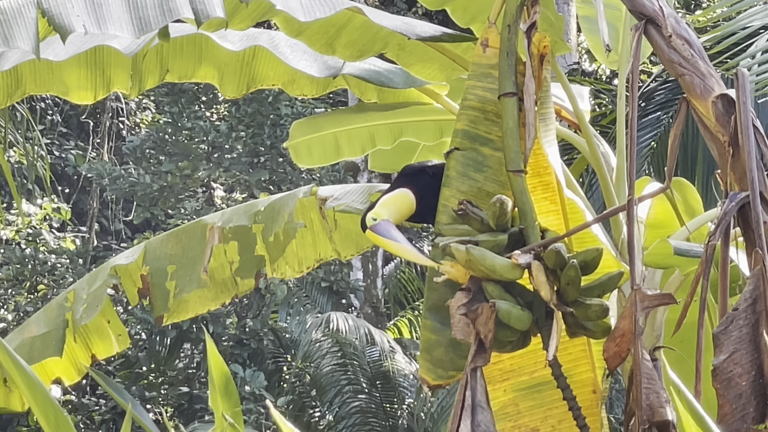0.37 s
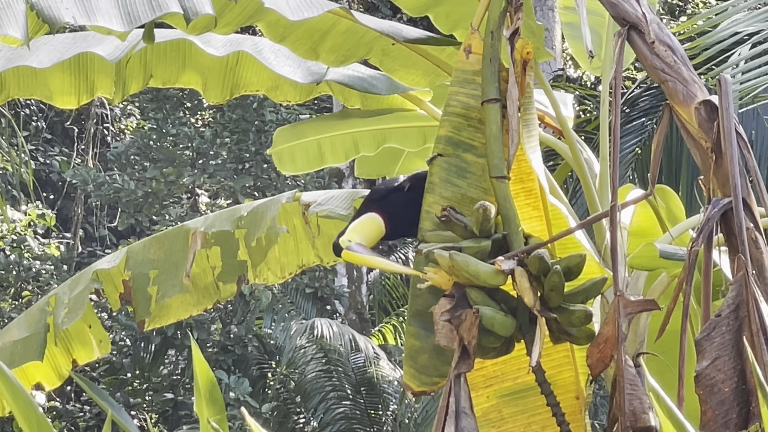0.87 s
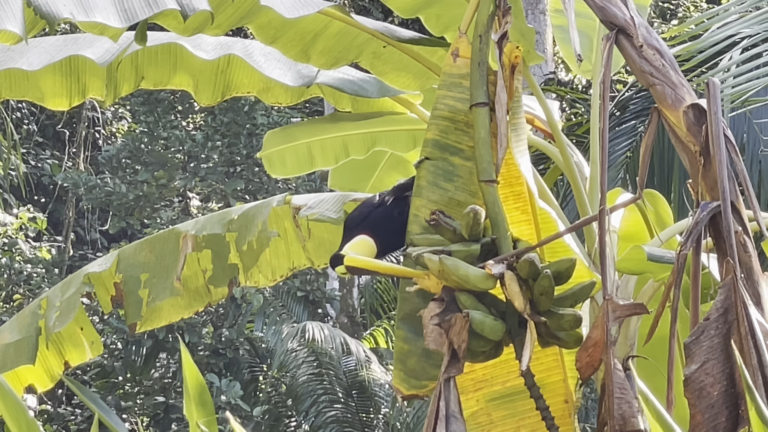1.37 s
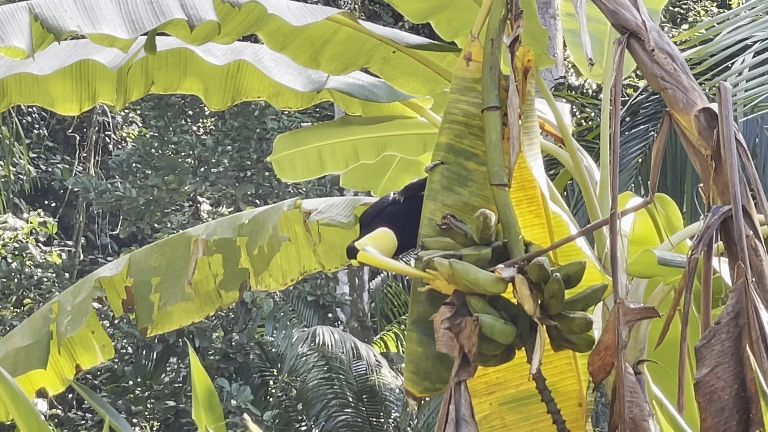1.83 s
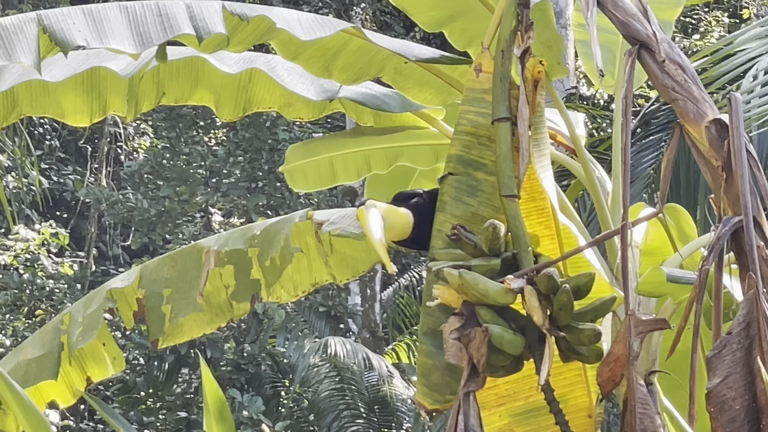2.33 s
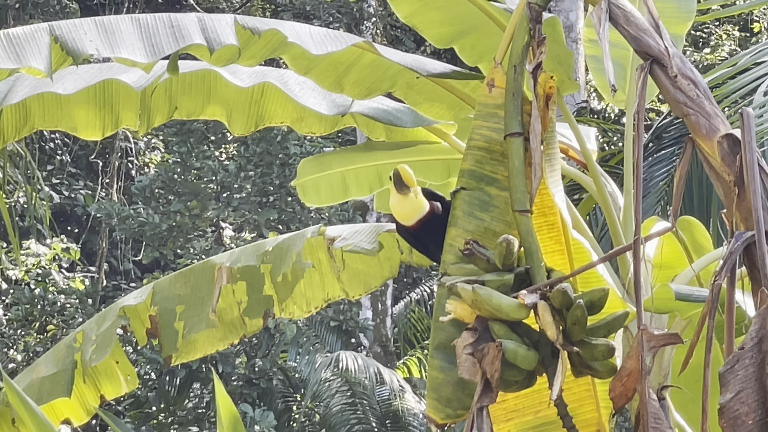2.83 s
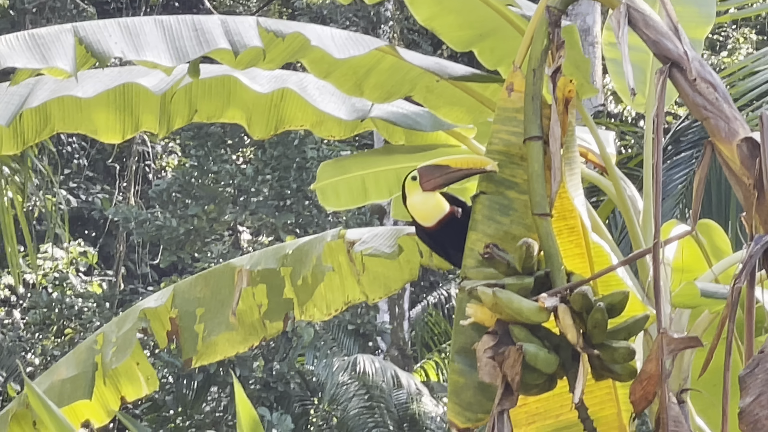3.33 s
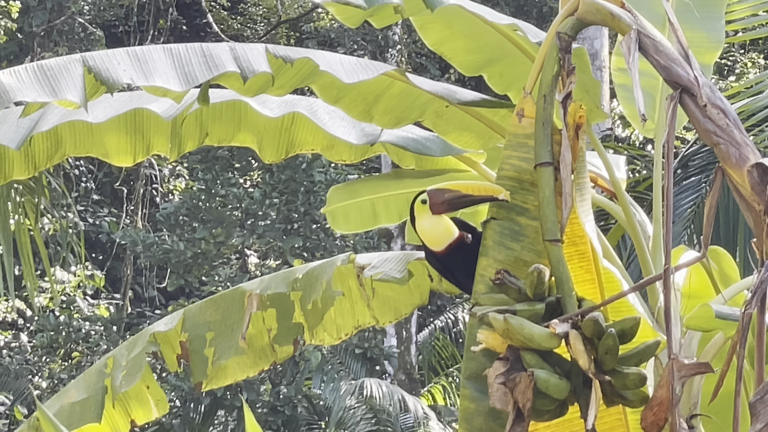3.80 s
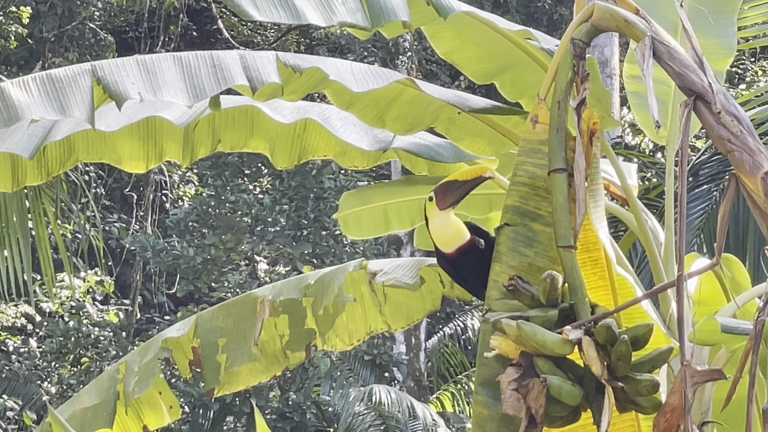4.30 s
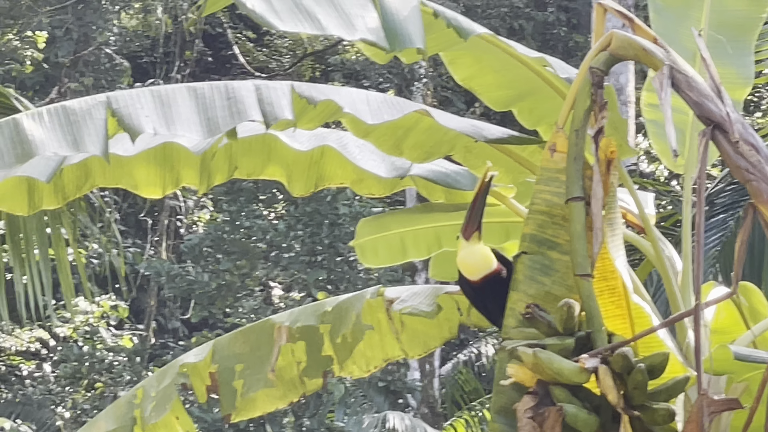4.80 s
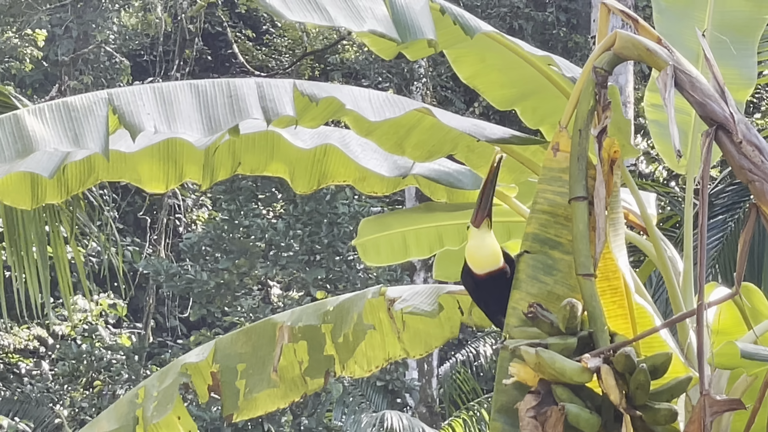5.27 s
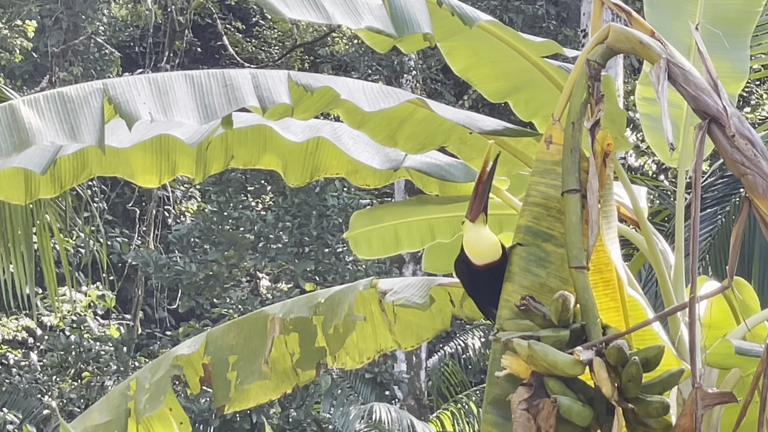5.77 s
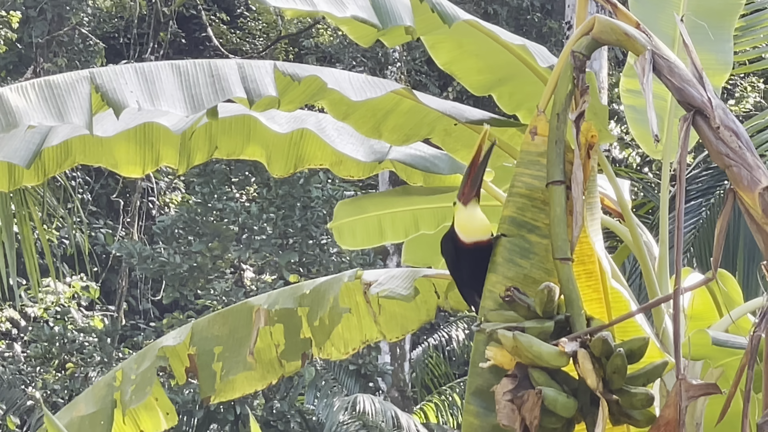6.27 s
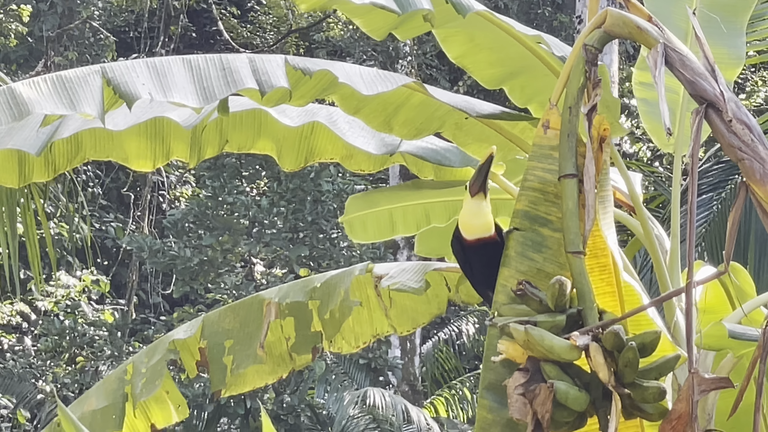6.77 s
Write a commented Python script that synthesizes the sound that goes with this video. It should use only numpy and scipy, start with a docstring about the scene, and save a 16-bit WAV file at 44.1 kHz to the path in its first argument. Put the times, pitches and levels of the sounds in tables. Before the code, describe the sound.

A cicada chorus sounds from start to end, about 7 seconds, in an open tropical forest: a shrill, narrow ringing near 3 kHz, made of several closely pitched wavering voices, pulsing around 18 times a second, with a fainter raspy edge above. The throb is clearest in the first 3 seconds and smooths later. A very high, thin sizzling buzz, around 12 to 15 kHz, fades by 3 s, creeps back and steps up at 4.2 s, then holds. Far leaf rustle and air hiss stay faint below. Low breeze flutters on the stereo microphone; from 0.8 s puffs push in, with deep soft thumps strongest near 0.95 and 1.4-1.5 s, continuing weaker until just past 3 s. Dull little housing ticks fall near 1.2, 1.35 and 2.15 s. Gentler puffs return around 4.3 and 6.2 s.

```python
"""From the start a cicada chorus rings in a tropical forest: tymbal clicks excite narrow body resonances near
3 kHz and throb about 18 times a second. Over it a very high buzz of filtered clicks fades by 3 s, creeps back
and steps up again at 4.2 s. Below lie far rustle and air hiss, both shaped noise. A noise breeze pushes and
flutters on two microphone ports; from about 0.8 s bell-shaped puffs rise out of it, with damped thumps until
just past 3 s and three dull ticks on the housing between 1.2 and 2.2 s."""
import sys
import numpy as np
from scipy import signal
from scipy.fft import rfft, irfft
from scipy.io import wavfile

SR = 44100
rng = np.random.default_rng(int(sys.argv[2]) if len(sys.argv) > 2 else 0)


def to_linear_factor(level_db):
    """Convert decibel levels (scalar or array-like) to linear amplitude factors."""
    exponent = np.asarray(level_db, float) / 20
    return 10 ** exponent


def generate_wav(sig):
    """Save sig (samples, or channels by samples) to the path in sys.argv[1] as 16-bit PCM at SR."""
    pcm = np.round(np.clip(np.atleast_2d(sig).T, -1, 1) * 32767).astype(np.int16)
    wavfile.write(sys.argv[1], SR, pcm)


N = 303408
HZ = np.maximum(np.arange(N // 2 + 1) * SR / N, 1)
CLICKS_PER_S = 20000


def rms_one(x):
    """Scale to unit rms."""
    return x / np.sqrt(np.mean(x ** 2) + 1e-20)


def in_time(rows):
    """Columns of a curve table, one value a sample."""
    s, *columns = np.transpose(rows)
    return [np.interp(np.arange(N) / SR, s, c) for c in columns]


def over_hz(rows):
    """Columns of a spectrum table, one value a frequency bin, straight over log frequency."""
    hz, *columns = np.transpose(rows)
    return [np.interp(np.log(HZ), np.log(hz), c) for c in columns]


def drift(rate_hz):
    """Slow random wander of spread 1: noise through two equal one-pole low-passes at rate_hz."""
    step = 40   # samples between drawn points
    settle = 2000   # points dropped while the filter fills
    r = np.exp(-2 * np.pi * step * rate_hz / SR)
    noise = rng.standard_normal(N // step + settle + 2)
    slow = signal.lfilter([1], [1, -2 * r, r * r], noise)[settle:]
    return np.interp(np.arange(N) / step, np.arange(len(slow)), rms_one(slow))


def coloured(colour):
    """Two unrelated noises, flat at 0 dB per Hz, shaped by a spectrum that closes beyond its end points."""
    gain = to_linear_factor(over_hz(colour)[0])
    gain = gain * np.minimum(HZ / colour[0][0], 1) ** 2
    gain = gain * np.minimum(colour[-1][0] / HZ, 1) ** 2
    return irfft(rfft(rng.standard_normal((2, N))) * gain, N) * np.sqrt(SR / 2)


def resonate(x, hz, width_hz):
    """A two-pole resonance passed twice, gain about 1 on top."""
    r = np.exp(-np.pi * width_hz / SR)
    g = (1 - r * r) / 2
    stage = [g, 0, -g, 1, -2 * r * np.cos(2 * np.pi * hz / SR), r * r]
    return signal.sosfilt([stage, stage], x)


def clicks(per_s):
    """Random clicks of either sign, 0 dB per Hz; two unrelated crowds."""
    born = rng.random((2, N)) < per_s / SR
    return rms_one(born * rng.standard_normal((2, N))) * np.sqrt(SR / 2)


# The nearest singer's throb. Each row: time in seconds, lead over a steady beat in turns, depth 0-1.
THROB_CURVE = [(0.0, -0.46, 0.55), (0.5, -0.62, 0.63), (0.8, -0.55, 0.65), (1.2, -0.23, 0.6),
               (2.0, -0.07, 0.8), (3.0, 0.13, 0.66), (3.6, -0.03, 0.45), (4.0, -0.38, 0.26),
               (4.4, -0.95, 0.22), (4.8, -1.17, 0.34), (5.6, -1.5, 0.36), (6.0, -1.5, 0.42),
               (6.88, -2.13, 0.08)]


def throb():
    """The beat of the tymbals: phase in turns, hurrying and dragging about a steady rate, and its depth."""
    throb_per_s = 17.8
    lead, depth = in_time(THROB_CURVE)
    return throb_per_s * np.arange(N) / SR + lead, depth


# Slow swell of the ringing bodies. Each row: time in seconds, loudness in dB (only its sway is used).
CHORUS_SWELL = [(0, -37.5), (1, -36.5), (2, -37), (2.7, -39), (3.1, -36.5), (3.7, -36.5), (4.3, -38.5),
                (5.3, -36), (6, -37.5), (6.88, -38)]


def chorus_swell():
    """Slow rise and fall of the chorus, in dB about its mean."""
    chorus_db = in_time(CHORUS_SWELL)[0]
    return chorus_db - chorus_db.mean()


# What the tymbal clicks ring with. Each row: centre in Hz, width in Hz, level in dB per Hz before the
# modulation, throb swing in dB at full depth, throb lag in turns.
BODY_BANDS = [(2933, 70, -63, 6.5, 0), (2842.5, 120, -64, 1, 0), (2763, 188, -66.5, -1.5, 0.021),
              (2580, 323, -75, 1.5, 0.0039), (2296, 200, -82.5, -1, 0.035), (1910, 92, -88, -3, 0.036),
              (3023, 74, -71.5, -2, 0.048), (3107, 177, -77.5, -4, 0.094), (3434, 300, -85.5, 7, 0.038),
              (3578, 46, -79, -6, 0.091), (5106, 1120, -83, 2, 0.4), (6990, 2280, -84, 2.5, 0.34),
              (7620, 780, -87, 8.5, 0.39), (8920, 1150, -93.5, 14, 0.37)]


def ringing_bodies():
    """Clicks ring the body with each throb, then a brighter rasp follows over a third of a turn later."""
    rasp_lag_turns = 0.2   # bands lagging more than this are the rasp
    far_per_s, far_db, far_start_turns = 12.6, 0.85, 0.3   # a farther singer's slower throb in the rasp
    turns, depth = throb()
    swell_db = chorus_swell()
    far_turns = far_per_s * np.arange(N) / SR + far_start_turns
    far_throb_db = far_db * np.cos(2 * np.pi * far_turns)
    crowds = [clicks(CLICKS_PER_S), clicks(CLICKS_PER_S)]
    out = 0
    for k, (hz, width_hz, level_db, swing_db, lag) in enumerate(BODY_BANDS):
        ringing_db = swell_db * (lag == 0)   # only bands without lag follow the slow swell
        rasp_db = far_throb_db * (lag > rasp_lag_turns)
        beat_db = swing_db * depth * np.cos(2 * np.pi * (turns - lag))
        effort = to_linear_factor(level_db + ringing_db + rasp_db + beat_db)
        out = out + resonate(crowds[k % 2] * effort, hz, width_hz)   # neighbours take turns at the crowds
    return out


# Nearer singers' notes. Each row: pitch in Hz, rms waver in Hz, level in dB before the modulation,
# throb swing in dB at full depth.
PURE_NOTES = [(2933, 21.95, -43, 5.5), (2885, 30.08, -45, 2.5), (2839, 25.04, -44.5, 5.5)]


def near_notes():
    """Bodies of nearer singers hold an almost pure sine whose pitch wavers separately in each channel."""
    turns, depth = throb()
    swell_db = chorus_swell()
    out = 0
    for hz, waver_hz, level_db, swing_db in PURE_NOTES:
        pitch = hz + waver_hz * np.array([drift(59.6), drift(56.0)])
        note = np.sqrt(2) * np.sin(2 * np.pi * np.cumsum(pitch, axis=1) / SR)
        beat_db = swing_db * depth * np.cos(2 * np.pi * turns)
        out = out + note * to_linear_factor(level_db + swell_db + beat_db)
    return out


# The buzz fading out, creeping back, then starting afresh. Each row: time in seconds, level in dB.
BUZZER_LEVEL = [(0, -48.5), (1.5, -48), (2.65, -52.5), (2.95, -63), (3.5, -60.5), (4.16, -53), (4.2, -49),
                (6.88, -49.2)]
# The buzzer's resonances. Each row: centre in Hz, width in Hz, relative level in dB.
BUZZER_BANDS = [(11990, 550, -3), (12720, 900, 1.5), (14450, 2200, -1), (15600, 1500, -8)]


def buzzer():
    """Dense clicks, rippled by under 1 dB at a wavering stroke rate, ring high resonances of alternate sign."""
    strokes_per_s, waver, swing_db = 250.5, 0.002, -0.4
    turns = np.cumsum(strokes_per_s * (1 + waver * drift(3.8))) / SR
    strokes = np.cos(2 * np.pi * turns) + 0.9 * np.cos(4 * np.pi * turns)
    train = clicks(CLICKS_PER_S) * to_linear_factor(swing_db * strokes)
    body = 0
    for k, (hz, width_hz, db) in enumerate(BUZZER_BANDS):
        body = body + to_linear_factor(db) * resonate(train, hz, width_hz) * (-1) ** k
    return to_linear_factor(in_time(BUZZER_LEVEL)[0]) * rms_one(body)


# Far rustle of the forest. Each row: time in seconds, gain in dB on top of the colour.
RUSTLE_SWELL = [(0.0, -61.5), (0.96, -64), (2.36, -61), (2.53, -58), (3.01, -61), (3.45, -58), (4.35, -58),
                (5.88, -59), (6.88, -56)]
# Its colour. Each row: frequency in Hz, density in dB per Hz before the swell.
RUSTLE_SPECTRUM = [(60, -45), (150, -23), (300, -23.5), (500, -25), (850, -25.5), (1300, -32), (2000, -36)]


def rustle():
    """Smooth far noise of leaves, swelling slowly with a small random wander."""
    return to_linear_factor(in_time(RUSTLE_SWELL)[0] + 0.93 * drift(2.1)) * coloured(RUSTLE_SPECTRUM)


# Steady air hiss. Each row: frequency in Hz, density in dB per Hz.
HISS_SPECTRUM = [(300, -91.5), (1000, -97.5), (1700, -91), (3750, -94.5), (4300, -86), (6000, -89.5),
                 (10000, -94), (11500, -92.5), (16000, -89.5)]


def hiss():
    """Steady shaped noise of the air."""
    return coloured(HISS_SPECTRUM)


def evened(x, share):
    """Take part of the chance swell out of a noise, so that the gust has more say in its level."""
    envelope = np.abs(signal.hilbert(x))
    return rms_one(x / (envelope + 0.41 * x.std()) ** share)


# Breeze between puffs. Each row: time in seconds, level of the deep push in dB, level of the flutter in dB,
# both before the random gusts and the low cut.
BREEZE = [(0, -55, -52.5), (.7, -59, -56.5), (.95, -40, -52), (1.1, -42, -45), (1.3, -45, -55),
          (1.55, -41, -46), (1.8, -51, -53), (2.4, -51.5, -55), (2.55, -64, -57), (2.85, -46, -44.5),
          (3.1, -54, -56.5), (3.5, -61.5, -56), (4.12, -64, -50.5), (4.4, -56, -54), (5.0, -56.5, -51.5),
          (5.95, -53, -49.5), (6.4, -48, -47), (6.88, -60, -54)]
# Colour of the push. Each row: frequency in Hz, relative density in dB.
PUSH_SPECTRUM = [(13, -43), (22, -11), (37, -8.5), (54, 6.5), (110, -8.5), (140, -37), (240, -120)]
# Colour of the flutter. Each row: frequency in Hz, relative density in dB.
FLUTTER_SPECTRUM = [(50, -29), (85, -1.5), (134, -3.5), (173, -11), (244, -17.5), (312, -26), (600, -47.5),
                    (780, -78), (1320, -120)]


def wind():
    """Eddies press on the ports: a deep push and a faster, lumpier flutter, both rising with each puff."""
    push_gust_db, flutter_gust_db, lumpy_db = 3.0, 1.2, 2.0
    push_db, flutter_db = in_time(BREEZE)
    puff_push, puff_flutter = puffs()
    eddies = drift(7.7)
    # breeze and puffs add as powers
    push = np.sqrt(to_linear_factor(2 * (push_db + push_gust_db * eddies)) + puff_push)
    flutter = np.sqrt(to_linear_factor(2 * (flutter_db + flutter_gust_db * eddies)) + puff_flutter)
    flutter = flutter * to_linear_factor(lumpy_db * drift(25.0))
    deep = push * evened(coloured(PUSH_SPECTRUM), 0.41)
    quick = flutter * evened(coloured(FLUTTER_SPECTRUM), 0.13)
    low_cut = signal.butter(2, 38, "high", fs=SR, output="sos")
    return signal.sosfilt(low_cut, deep + quick)


# Puffs that rise out of the breeze. Each row: time of the top in seconds, level of the push in dB,
# length in seconds, flutter over the push in dB; levels before the low cut.
PUFF_LIST = [(0.837, -41.5, 0.042, -6), (0.957, -29.5, 0.042, -19), (1.066, -35, 0.11, -4.5),
             (1.275, -42, 0.067, -8), (1.423, -24.5, 0.054, 1.5), (1.528, -29.5, 0.051, -9),
             (1.634, -36.5, 0.034, -3.5), (1.71, -39, .04, -3), (1.84, -42, 0.034, -16),
             (1.964, -44, 0.12, -4.5), (2.108, -43.5, .06, -7), (2.278, -42, .04, -4),
             (2.37, -45, 0.053, -6), (2.592, -49.5, .05, 6.5), (2.794, -43, 0.069, -6),
             (3.18, -46, .06, -10), (3.35, -45, .07, -0.5), (4.284, -43.5, .05, -6), (4.362, -40, .04, -11),
             (4.482, -43.5, 0.061, 2.5), (4.74, -47.5, 0.061, -15), (5.1, -46, .04, -4),
             (6.05, -45, .05, -13), (6.163, -37.5, 0.043, -8), (6.405, -43, .05, -12), (6.8, -47.5, .07, 0)]


def puffs():
    """Each puff swells and sinks like a bell; powers of the push and of the flutter."""
    rise_share = 0.47   # share of a puff's length spent rising
    step = 40   # samples between points of the curve
    s, push_db, length_s, flutter_db = np.transpose(PUFF_LIST)[:, :, None]
    late = np.arange(0, N, step) / SR - s
    side_s = length_s * np.where(late < 0, rise_share, 1 - rise_share)
    bell = np.exp(-2 * (late / side_s) ** 2)
    powers = []
    for db in (push_db, push_db + flutter_db):
        total = (bell * to_linear_factor(2 * db)).sum(axis=0)
        powers.append(np.interp(np.arange(N) / step, np.arange(len(total)), total))
    return powers


def knocks(rows, damping):
    """Each knock is a soft press ringing a short damped swing, sent to the shared part of both ports."""
    out = np.zeros(N)
    for s, peak_db, hz in rows:
        click = np.zeros(N)
        press = np.hanning(int(0.3 * SR / hz))   # a soft contact, a third of a swing long
        click[round(s * SR):][:len(press)] = press
        swing = resonate(click + 1e-18, hz, damping * hz)
        out -= to_linear_factor(peak_db) * swing / np.abs(swing).max()
    return out * [[1], [0]]


# Single eddies. Each row: start in seconds, peak in dB ahead of the ports, pitch in Hz.
THUMP_LIST = [(.938, -26, 54), (1.062, -33, 110), (1.408, -24.5, 102), (1.445, -21, 61.6),
              (1.497, -30, 150), (1.522, -23, 70), (1.635, -36, 104), (2.164, -35, 149), (2.256, -38, 148),
              (2.352, -42, 59), (2.572, -35.5, 103), (2.779, -34, 69.5), (2.856, -35.5, 60),
              (2.908, -30.5, 110), (3.162, -40, 65)]


def thumps():
    """Single eddies thump on the ports as low, heavily damped swings."""
    return knocks(THUMP_LIST, damping=0.9)


# Small dull ticks. Each row: start in seconds, peak in dB ahead of the ports, pitch in Hz.
TICK_LIST = [(1.193, -37.5, 353), (1.351, -38.5, 439), (2.163, -45, 417)]


def ticks():
    """Small dull ticks on the housing, higher and even more damped."""
    return knocks(TICK_LIST, damping=1.0)


# The two ports. Each row: frequency in Hz, lead of the left in radians, likeness 0-1, left over right in dB.
PORT_PAIR = [(40, -0.4, 1, -1.5), (130, -0.5, 0.8, 2.5), (304, -0.1, 0.54, 3.5), (686, -2, 0.31, 1.5),
             (1040, -2.5, 0.18, 2), (1350, 1, 0.72, 3.5), (1750, 0, 0.9, 2), (1900, 0, .998, 0),
             (2330, 0, .998, 0), (2600, 0.58, 0.96, 0), (3300, 0.48, 0.98, 0.5), (3520, -0.3, 0.87, -0.5),
             (3750, 0, .975, 0), (4100, 0, .975, 0), (4860, 0.78, 0.96, 0.5), (5400, 0.5, 1, -1),
             (5750, -2, 0.83, -1), (6700, 0.7, 0.64, 1), (7380, -2, 1, -1.5), (8200, -2.5, 0.83, 2),
             (8350, -3.14, .998, 0), (9000, -3.14, .998, 0), (9250, -3, 0.86, -4), (9930, -3.5, 0.53, 1.5),
             (11600, -5.5, 0.95, -1), (12900, -5.5, 0.9, 0.5), (13200, -6.28, .998, 0),
             (15050, -6.28, .998, 0), (15600, -5, 1, 1)]


def ports(shared, apart):
    """Blend what both ports share with what differs, each port with its own phase and tilt."""
    lead, alike, tilt_db = over_hz(PORT_PAIR)
    mid = rfft(shared) * np.sqrt((1 + alike) / 2)
    side = rfft(apart) * np.sqrt((1 - alike) / 2)
    turn = to_linear_factor(tilt_db / 2) * np.exp(0.5j * lead)
    return irfft(np.array([(mid + side) * turn, (mid - side) / turn]), N)


def scene():
    """All sources arrive at the pair of ports."""
    insects = ringing_bodies() + near_notes() + buzzer()
    air = rustle() + hiss() + wind()
    shared, apart = insects + air + thumps() + ticks()
    return ports(shared, apart)


def low_pass(x):
    """Removes everything above the highest recorded frequency."""
    return signal.sosfilt(signal.butter(12, 17050, fs=SR, output="sos"), x)


def record(dry):
    """The top is cut off sharply."""
    cutoff_hz = 15730
    cut = irfft(rfft(dry) * (HZ < cutoff_hz), N)
    return low_pass(cut)


dry = scene()
out = record(dry)
generate_wav(out)
```